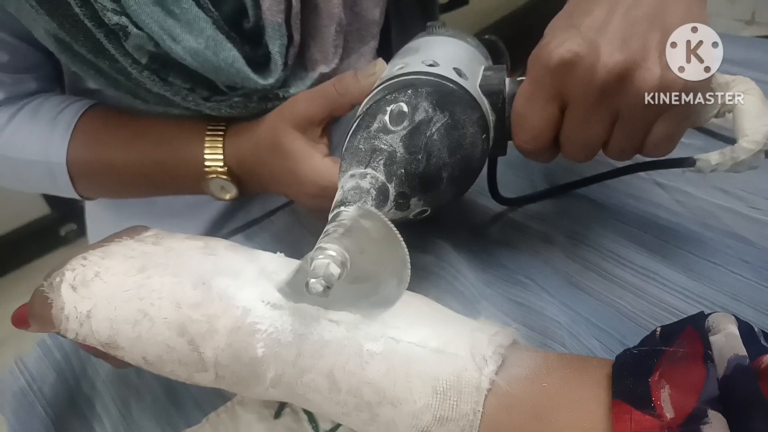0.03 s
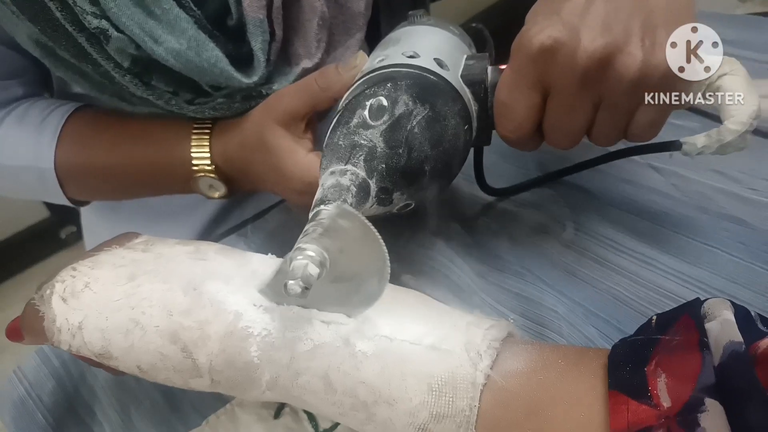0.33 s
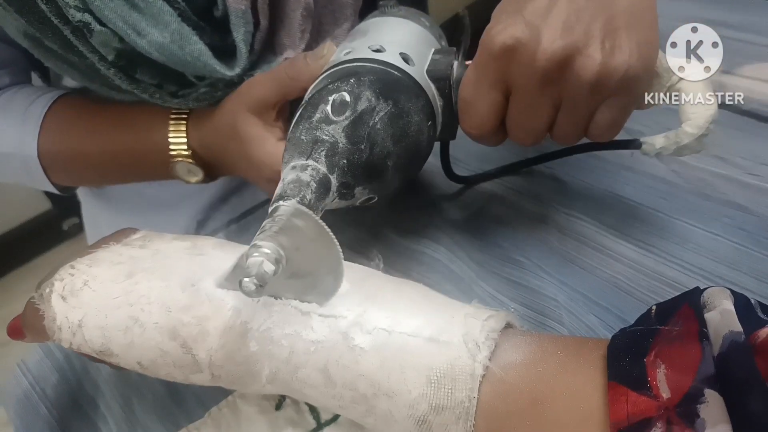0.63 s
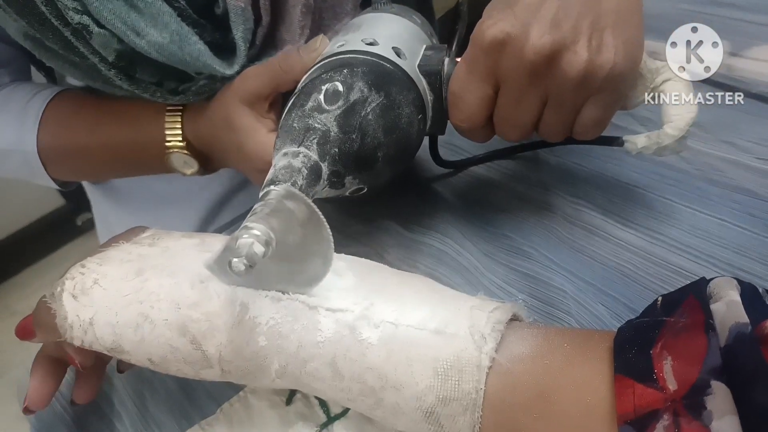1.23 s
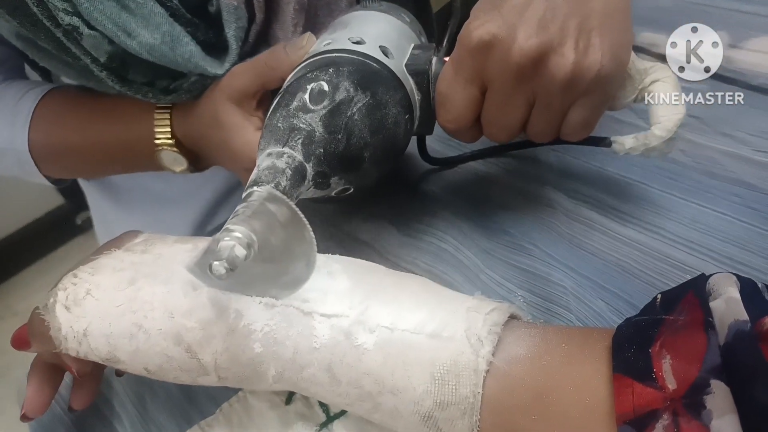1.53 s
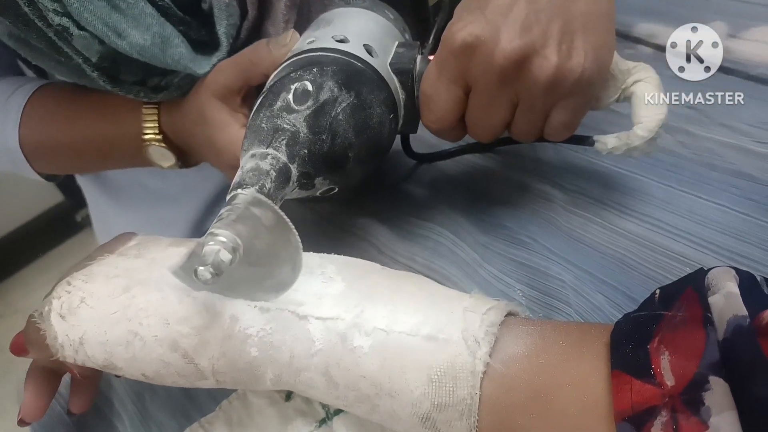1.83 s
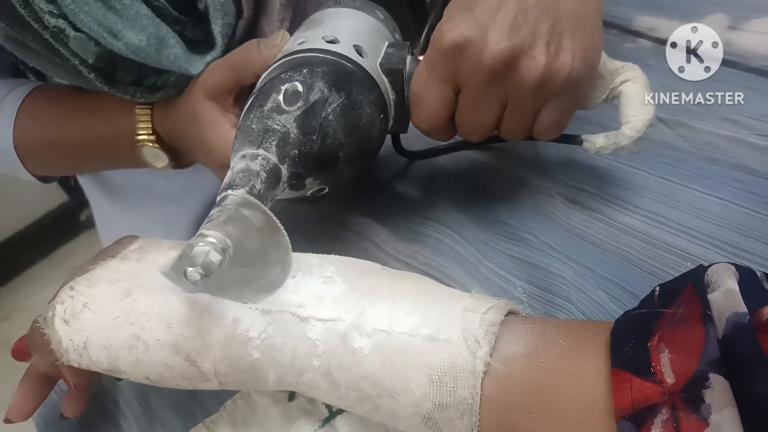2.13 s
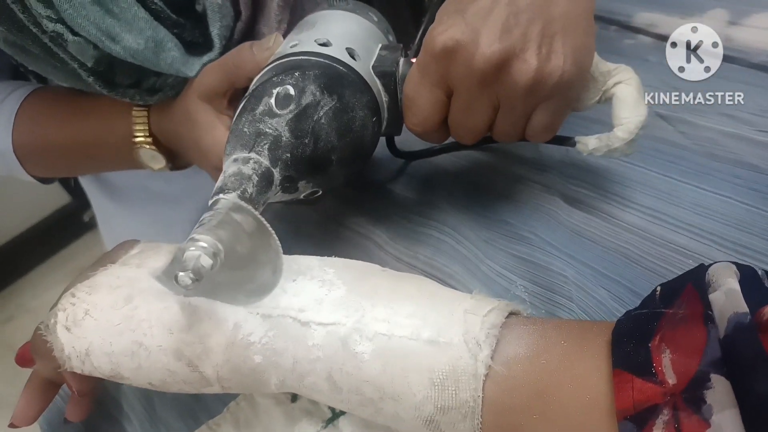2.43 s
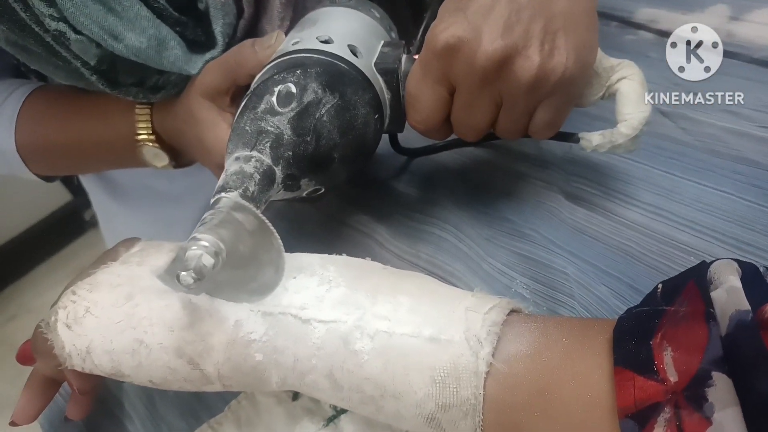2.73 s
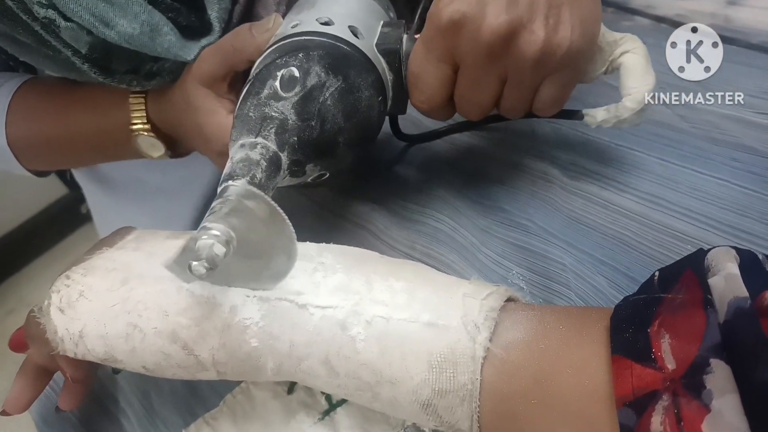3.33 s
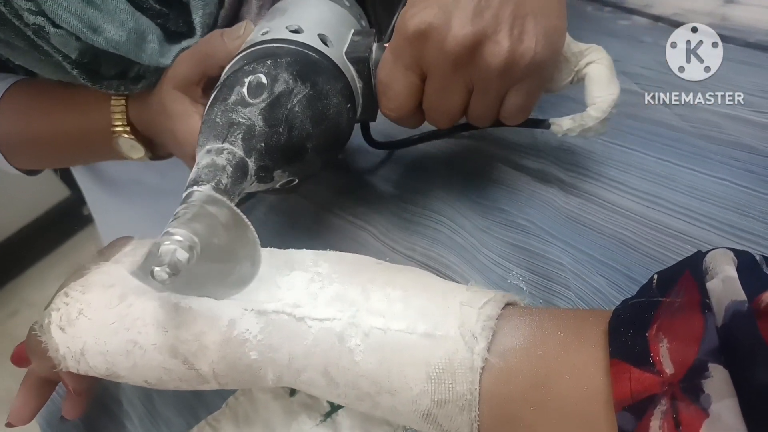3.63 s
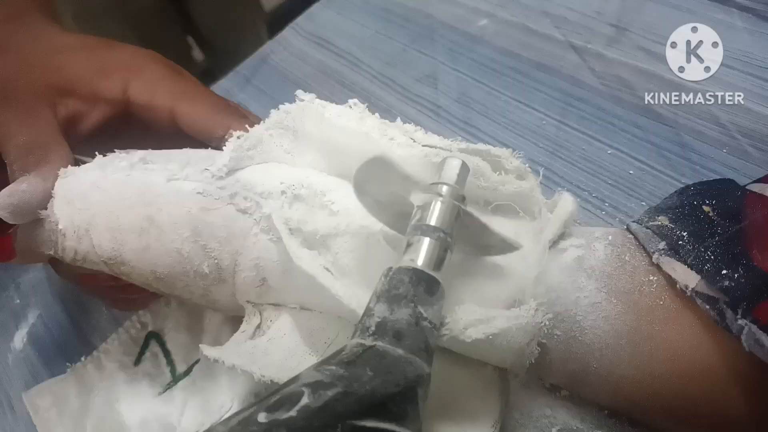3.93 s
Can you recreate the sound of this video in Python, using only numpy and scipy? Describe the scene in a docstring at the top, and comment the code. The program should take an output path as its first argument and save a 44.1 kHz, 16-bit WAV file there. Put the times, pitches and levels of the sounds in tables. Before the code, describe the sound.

An electric saw cuts a plaster cast, buzzing and grinding without a break. Its pitch dips as it bites deep, then rises into a rougher chatter with brief snags, heard close up in a small room.

```python
"""An electric cast saw cuts along a plaster cast, close up in a small room.
Its blade swings back and forth very fast, so it hums and buzzes. It slows and sings as it bites
deep, then rides higher and chatters on the hollow shell, snagging now and then.
Its teeth grind plaster on every stroke, and the motor adds a thin whine."""
import sys
import numpy as np
from scipy import signal
from scipy.fft import rfft, irfft, next_fast_len
from scipy.io import wavfile
from scipy.ndimage import uniform_filter1d, map_coordinates

SR = 44100
rng = np.random.default_rng(int(sys.argv[2]) if len(sys.argv) > 2 else 0)


def store_pcm(level_fs):
    """Save levels as 16-bit WAV."""
    pcm = np.round(np.clip(level_fs, -1, 1) * 32767).astype(np.int16)
    wavfile.write(sys.argv[1], SR, np.atleast_2d(pcm).T)


N = 176400
FLUTTER_DB = .7  # size of the small random wavers in loudness

# Loudness of the blade's hum, and of the note an octave above: time_s, level_db
HUM_LEVEL = [(0.2, -62), (0.24, -54), (0.42, -64), (0.57, -49.5), (1.48, -45.5), (2.04, -54.5), (2.52, -48),
             (2.55, -59), (3.18, -46.5), (3.41, -53), (3.46, -80), (3.6, -48.5), (3.72, -69), (3.77, -51.5),
             (4.0, -61)]
OCTAVE_LEVEL = [(.2, -50.5), (.3, -42.5), (.55, -46), (.75, -54), (1.15, -49.5), (1.4, -54.5), (1.9, -49),
                (2.3, -50.5), (2.7, -49.5), (3, -45), (3.2, -51), (3.5, -50.5), (3.65, -47), (4, -49)]
# Loudness of the buzz in a deep cut and in a shallow one: time_s, level_db
DEEP_LEVEL = [(.45, -58), (.6, -40), (.75, -37.5), (.95, -38.2), (1.15, -43.5), (1.35, -53), (1.6, -66)]
SHALLOW_LEVEL = [(.2, -48), (.5, -45), (.8, -64), (1.2, -51), (1.55, -42), (1.95, -43), (2.25, -47.5),
                 (2.5, -43), (2.75, -47), (3.03, -39.5), (3.25, -47), (3.5, -46), (3.68, -45), (4, -49)]
# Tone of those two buzzes: pitch_hz, level_db
DEEP_TONE = [(1040, -1), (1400, -4.5), (1750, -2.5), (2080, -3), (2420, 2), (2790, 6), (3100, -1.5),
             (3700, -3), (4200, 2), (5100, 1), (5900, -6), (7400, -11.5), (8000, -14), (9000, -11),
             (11000, -10), (12400, -9), (15000, -27)]
SHALLOW_TONE = [(1100, -18), (1470, -8), (1850, -2), (2200, -5.5), (2600, -.5), (2950, 1), (3700, 3),
                (4050, -12), (4500, 4), (5500, -11), (6700, -28), (7800, -15), (9800, -24), (13000, -16),
                (15000, -40)]
def blade(strokes, speed_hz, rattle):
    """The swinging blade hums, with a clean buzz when deep and a rattling one when shallow."""
    hum_gain = amp(curve(HUM_LEVEL) - 0.5 + FLUTTER_DB * wobble(21.9))
    hum = hum_gain * np.sin(2 * np.pi * strokes + 0.34 * wobble(40))
    octave_gain = amp(curve(OCTAVE_LEVEL) + 2 * FLUTTER_DB * wobble(25.25))
    octave = octave_gain * np.sin(4 * np.pi * strokes + 0.38 * wobble(40))
    clean = buzz(strokes, speed_hz, DEEP_TONE, flutter_db=2.1, smear=.1, drift_hz=60)
    rough = buzz(strokes, speed_hz, SHALLOW_TONE, flutter_db=2, smear=.16, drift_hz=55)
    deep = amp(curve(DEEP_LEVEL)) * clean
    shallow = amp(curve(SHALLOW_LEVEL)) * hand_pressure() * rattle * rough
    return np.sqrt(2) * (hum + octave) + deep + shallow


def buzz(strokes, speed_hz, tone, flutter_db, smear, drift_hz):
    """Notes at whole multiples of the stroke rate, each fluttering as the contact shifts."""
    out = np.zeros(N)
    for k in np.arange(3, 42):
        drift = rng.uniform(0, 2 * np.pi) + smear * np.sqrt(k) * wobble(drift_hz)
        gain = amp(along(tone, k * speed_hz) + flutter_db * wobble(30.07))
        out += gain * np.sin(2 * np.pi * k * strokes + drift)
    return unit(out)


# Loudness of the grinding, a bright scrape and a higher hiss: time_s, level_db
GRIT_LEVEL = [(0.2, -45), (0.25, -40), (0.7, -39.5), (1.1, -42), (1.17, -38.5), (1.26, -46.5),
              (1.34, -41.5), (1.5, -41), (2.05, -42), (2.45, -40.5), (2.8, -42), (3, -39), (3.2, -42),
              (3.33, -41.5), (3.55, -42), (4, -40.5)]
SCRAPE_LEVEL = [(.2, -81), (1.2, -60), (1.55, -50.5), (2, -43), (2.2, -50.5), (3.1, -51.5), (3.35, -47.5),
                (3.6, -54), (4, -55)]
HISS_LEVEL = [(.2, -53.5), (.45, -48), (.65, -60), (1.1, -53.5), (1.3, -46.5), (1.6, -47.5), (1.8, -60),
              (2.5, -56), (3.3, -94), (4, -70)]
# Tone of the same three: pitch_hz, level_db
GRIT_TONE = [(60, -47), (280, -15), (500, -9.5), (900, -1.5), (1300, -2.5), (2000, -2), (3000, -2.5),
             (4200, 1.5), (5000, 5.5), (5800, -2), (6700, -0.5), (7700, -5.5), (8800, -6), (9800, 1),
             (10700, -8.5), (13200, -10), (14200, -23.5), (15500, -33)]
SCRAPE_BAND = [(2000, -51), (5600, -12), (6300, 0.5), (6950, 2), (7500, -11), (15000, -33)]
HISS_BAND = [(3000, -54), (9000, -19), (9550, 6.5), (10100, 2), (10600, -11), (15000, -36)]
def grinding(strokes):
    """Teeth crush plaster on each swing, more weakly on the way back."""
    beats = np.arange(1600)
    push = bursts(strokes, jitter(beats, 0.068), scatter_db=4.5, decay_s=0.00029)
    back = bursts(strokes, jitter(beats + .5, 0.2), scatter_db=7.0, decay_s=0.00027)
    crumbs = (0.4 + push + .5 * back) * rng.standard_normal((3, N))
    quieter_db = 2.5 * share_of_peak(DEEP_LEVEL)  # a deep cut sings more and grinds less
    grit = amp(curve(GRIT_LEVEL) + .5 - quieter_db) * ring(crumbs[0], GRIT_TONE)
    scrape = amp(curve(SCRAPE_LEVEL)) * ring(crumbs[1], SCRAPE_BAND)
    hiss = amp(curve(HISS_LEVEL)) * ring(crumbs[2], HISS_BAND)
    return amp(FLUTTER_DB * wobble(40)) * (grit + scrape + hiss)


def catches(strokes):
    """The blade catches the shell in runs of every second or every third stroke."""
    gaps = np.where(uniform_filter1d(rng.standard_normal(900), 12) > .15, 2, 3)
    return bursts(strokes, jitter(np.cumsum(gaps), .07), scatter_db=2.0, decay_s=0.00055)


# Loudness of the blade's rasp: time_s, level_db
RASP_LEVEL = [(.2, -44.5), (.27, -38.5), (.46, -38.5), (.7, -45), (1.05, -45.5), (1.16, -41), (1.26, -46),
              (1.42, -43.5), (1.6, -38.5), (1.8, -39.5), (1.95, -44), (2.11, -39), (2.4, -40), (2.7, -39.5),
              (3.03, -41.5), (3.4, -42.5), (3.8, -44.5), (4, -39)]
# Tone of the rasp: pitch_hz, level_db
RASP_TONE = [(600, -39), (1900, -15), (2250, -8.5), (2600, 3.5), (3150, 1.5), (3700, 1), (4100, -6.5),
             (6500, -18), (10000, -23), (15000, -26)]
# How much of the rasp rings at a lower pitch: time_s, share
LOW_SHARE = [(.6, 0.59), (1.6, 0.0032)]
def rasp(rattle):
    """The rattling blade rasps, ringing low at first and higher as it leaves the deep cut."""
    share = curve(LOW_SHARE)
    scrapes = rattle * rng.standard_normal((2, N))
    high = np.sqrt(1 - share) * ring(scrapes[0], RASP_TONE)
    low = np.sqrt(share) * ring(scrapes[1], RASP_TONE, pitch_ratio=0.858)
    return amp(curve(RASP_LEVEL) - 2.0 + FLUTTER_DB * wobble(35.25)) * (high + low)


# Loudness of the blade chattering on the shell: time_s, level_db
CHATTER_LEVEL = [(.2, -60), (.48, -56), (.66, -74), (1.35, -69), (1.52, -54), (1.75, -50), (1.87, -56),
                 (2.03, -56), (2.12, -50), (2.28, -52), (2.44, -46.5), (2.6, -49), (2.8, -51),
                 (3.02, -54.5), (3.3, -68.5), (3.55, -57), (4, -52)]
# Tone of the shell's knock: pitch_hz, level_db
SHELL_TONE = [(40, -26), (95, -24), (125, -14.5), (220, -9), (300, -12), (420, -3), (520, 6), (630, 1.5),
              (780, -0.5), (1000, -18.5), (1500, -19), (3000, -14), (8000, -52)]
def chatter(jolts):
    """Each catch of the blade knocks on the hollow shell."""
    blows = np.zeros(N)
    peaks = signal.find_peaks(jolts, height=.1)[0]
    blows[peaks] = jolts[peaks]
    scuffs = 1.04 * jolts * rng.standard_normal(N)
    return amp(curve(CHATTER_LEVEL) + 2.5) * ring(unit(blows) + scuffs, SHELL_TONE)


# Moments when the blade snags in the plaster: middle_s, half_length_s, level_db, pitch_ratio
SNAG_MOMENTS = [(1.155, .012, -42, .85), (1.877, 0.01, -36.5, .76), (2.457, 0.019, -35, 1),
                (2.872, .011, -36.5, .95), (3.029, .011, -33.5, 0.914), (3.623, 0.0076, -41, 0.79)]
# Tone of the snagged blade: pitch_hz, level_db
SNAG_RING = [(1500, -25.5), (3000, -4.5), (3700, 1.5), (4300, -13), (12000, -30)]
def snags(strokes):
    """A snagged blade clacks on every second stroke and rings at a pitch set by its grip."""
    clacks = bursts(strokes, jitter(np.arange(0, 1600, 2), .1), scatter_db=2, decay_s=0.00042)
    out = np.zeros(N)
    for middle_s, half_length_s, level_db, pitch_ratio in SNAG_MOMENTS:
        crunch = (0.37 + clacks) * rng.standard_normal(N)
        out += amp(level_db) * hump(middle_s, half_length_s) * ring(crunch, SNAG_RING, pitch_ratio)
    return out


# Moments when the hand eases off: middle_s, half_length_s, dip_db
HAND_LIFTS = [(0.509, 0.013, -4), (1.389, 0.0099, -9), (2.28, 0.034, -5), (2.91, 0.012, -4.5),
              (3.485, 0.008, -4.5), (3.577, 0.016, -3)]
def hand_pressure():
    """A volume control for the cutting: it dips whenever the hand eases off."""
    return amp(sum(dip_db * hump(middle_s, half_s) for middle_s, half_s, dip_db in HAND_LIFTS))


# Loudness of the motor's whine: time_s, level_db
WHINE_LEVEL = [(.2, -81), (1.2, -64), (1.9, -56), (2.7, -65), (3.05, -54.5), (3.35, -51.5), (3.52, -57.5),
               (3.65, -61)]
# Pitch of each note in the whine: multiple_of_stroke_rate
WHINE_MULTIPLES = [8, 14, 15, 24]
# Strength of each of those notes: level_db
WHINE_STRENGTHS = [0, -2, -3, -1.5]
def motor(strokes):
    """Thin, high notes that rise and fall with the speed of the shaft."""
    notes = np.zeros(N)
    for k, level_db in zip(WHINE_MULTIPLES, WHINE_STRENGTHS):
        gain = amp(level_db + FLUTTER_DB * wobble(28))
        notes += gain * np.sin(2 * np.pi * k * strokes + .5 * wobble(50))
    return np.sqrt(2) * amp(curve(WHINE_LEVEL)) * notes


# Loudness of the cast's rumble: time_s, level_db
RUMBLE_LEVEL = [(0.2, -70), (0.28, -62), (0.4, -100), (0.59, -63), (1.7, -68.5), (1.82, -53.5), (2.08, -86),
                (2.13, -56.5), (2.32, -77), (2.37, -58), (2.72, -59), (2.74, -67), (3.37, -71),
                (3.43, -59.5), (3.98, -66), (4.0, -70)]
# Tone of the rumble: pitch_hz, level_db
RUMBLE_TONE = [(20, -13), (55, -20), (95, -16), (122, -10.5), (148, 10), (175, -2.5), (215, -8), (270, -32),
               (600, -45), (3000, -79)]
def rumble():
    """The hollow cast gives a low, uneven rumble."""
    gain = amp(curve(RUMBLE_LEVEL) - 1.0 + 2.0 * wobble(24))
    return gain * ring(rng.standard_normal(N), RUMBLE_TONE)


# How long the room's echo takes to fade by 60 dB: pitch_hz, fade_s
ECHO_FADE = [(150, 0.15), (2000, 0.11), (12000, 0.093)]
# Strength of the echo: pitch_hz, level_db
ECHO_TONE = [(150, -14), (720, -11), (1100, -2.5), (4000, -3), (12000, -2)]
def room(x):
    """A short echo on each side that keeps changing as saw and hands move."""
    hz, time_s, noise = signal.stft(rng.standard_normal((4, 2, SR // 4)), SR, nperseg=256)
    fade = amp(-60 * time_s / along(ECHO_FADE, hz)[:, None])
    tails = signal.istft(noise * fade, SR, nperseg=256)[1]
    tails /= np.linalg.norm(tails[0, 0])
    echoes = signal.fftconvolve(x[None, None], tails, axes=2)[..., :N]
    shares = np.array([wobble(9) for tail in tails])  # a drifting blend of four echoes
    shares /= np.linalg.norm(shares, axis=0)
    blend = np.sum(echoes * shares[:, None], axis=0)
    return filtered(blend, lambda hz: amp(along(ECHO_TONE, hz)))


def amp(db):
    """Turn decibels into a number to multiply by."""
    return 10 ** (np.asarray(db) / 20)


def unit(x):
    """Scale a sound to an average power of 1."""
    return x / np.sqrt(np.mean(x ** 2) + 1e-20)


def along(rows, hz):
    """Look up a pitch between (pitch_hz, value) rows, on a log scale."""
    pitches, values = np.transpose(rows)
    return np.interp(np.log(hz + 1), np.log(pitches + 1), values)


def curve(rows):
    """Join (time_s, value) rows with straight lines, one value per sample."""
    return np.interp(np.arange(N) / SR, *np.transpose(rows))


def share_of_peak(rows):
    """A loudness table as a curve that is 1 at its loudest."""
    return amp(curve(rows) - np.max(curve(rows)))


def hump(middle_s, half_length_s):
    """A smooth rise to 1 and fall back."""
    return np.exp(-((np.arange(N) / SR - middle_s) / half_length_s) ** 2 / 2)


def wobble(rate_hz):
    """A smooth curve through rate_hz random points a second."""
    points = rng.standard_normal(int(N * rate_hz / SR) + 4)
    coarse = np.arange(0, N, 16)
    smooth = map_coordinates(points, [coarse * rate_hz / SR], mode="nearest")
    return np.interp(np.arange(N), coarse, smooth)


def jitter(beats, spread):
    """Make each beat a little early or late."""
    return beats + spread * rng.standard_normal(len(beats))


def bursts(strokes, beats, scatter_db, decay_s):
    """A short swell of random size each time the stroke count reaches a beat."""
    starts = np.searchsorted(strokes, beats[(beats > 0) & (beats < strokes[-1])])
    sizes = amp(scatter_db * np.clip(rng.standard_normal(len(starts)), -2, 2))
    age = np.arange(SR // 20) / SR / decay_s
    swell = age ** 4 * np.exp(-age)
    return unit(signal.fftconvolve(np.bincount(starts, sizes, N), swell)[:N])


def filtered(x, response):
    """Multiply each pitch in x by response(hz)."""
    size = next_fast_len(N + SR // 2)
    return irfft(rfft(x, size) * response(np.fft.rfftfreq(size, 1 / SR)), size)[..., :N]


def ring(x, tone, pitch_ratio=1):
    """Let x shake an object that rings with this tone; the result has power 1."""
    size = 8192
    tone_db = along(np.array(tone) * [pitch_ratio, 1], np.fft.rfftfreq(size, 1 / SR))
    folded = irfft(np.log(amp(tone_db)))
    folded[1:size // 2] *= 2  # fold in time, so the ringing comes only after each hit
    folded[size // 2 + 1:] = 0
    one_tap = irfft(np.exp(rfft(folded)))[:size // 2]
    return unit(signal.fftconvolve(x, one_tap)[:N])


# Blade strokes each second: time_s, speed_hz
BLADE_SPEED = [(.15, 362), (.33, 367), (.5, 365), (.65, 356), (.83, 344.5), (1, 349), (1.2, 365.5),
               (1.4, 374), (1.6, 380), (1.85, 374), (2.1, 369.5), (2.45, 374.5), (2.8, 371), (3.1, 367),
               (3.35, 360.5), (3.7, 370), (4, 372.5)]
# How the sound swells in: time_s, level_db
FADE_IN = [(.134, -58), (.146, -8), (.19, -2.5), (.24, 2.5)]
# How far the left side's wave runs ahead of the right's: pitch_hz, lead_radians
LEFT_LEAD = [(0, 1.5), (1290, -0.5), (1550, -1.1), (1810, -1), (3360, -1.5), (3960, -2), (6800, -6),
             (7240, -5), (7670, -10.5), (9650, -15), (11200, -14.5), (11800, -18.5), (13200, -15.5),
             (15100, -32)]
# How much louder the left side is: pitch_hz, level_db
LEFT_BOOST = [(60, 4), (110, 1), (200, 4.5), (380, 0.5), (700, 3.5), (1290, 0), (2370, -1.5), (4380, 2.5),
              (8080, -3.5), (14900, -10.5)]
def scene():
    """One shaft speed drives the saw; the blade sits a little to the right, the motor straight ahead."""
    speed_hz = curve(BLADE_SPEED) + 0.3034 * wobble(14)
    strokes = np.cumsum(speed_hz) / SR  # strokes made so far
    jolts = catches(strokes)
    hardness = share_of_peak(CHATTER_LEVEL)
    rattle = (0.52 + 1.25 * hardness * jolts) / np.hypot(.45, 1.27 * hardness)
    swell = amp(curve(FADE_IN))
    tones = swell * blade(strokes, speed_hz, rattle)
    whine = swell * motor(strokes)
    rubbing = grinding(strokes) + rasp(rattle) + chatter(jolts) + rumble()
    cutting = amp(-0.54) * swell * (hand_pressure() * rubbing + snags(strokes))
    sides = np.array([[.5], [-.5]])  # left, right
    direct = whine + filtered(tones + cutting, lambda hz: np.exp(1j * sides * along(LEFT_LEAD, hz)))
    echo = room(cutting + amp(-6.5) * (tones + whine))  # tones arrive more directly than grinding
    return filtered(amp(-1.96) * direct + echo, lambda hz: amp(sides * along(LEFT_BOOST, hz)))


TOP_HZ = 15530
def record(dry):
    """Cut away the very highest treble."""
    return filtered(dry, lambda hz: hz < TOP_HZ)


dry = scene()
out = record(dry)
store_pcm(out)
```